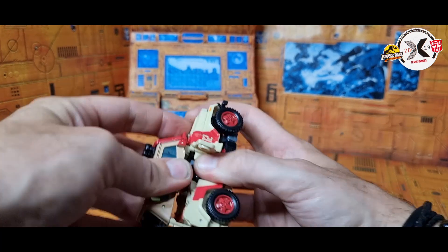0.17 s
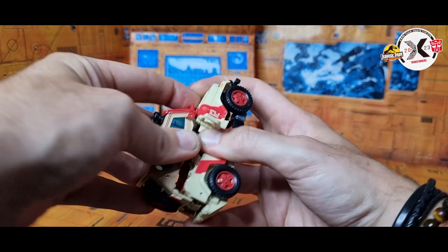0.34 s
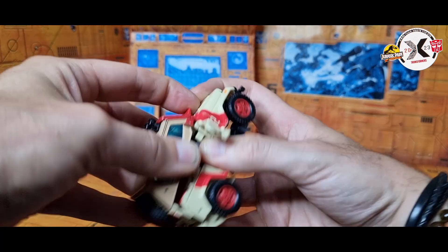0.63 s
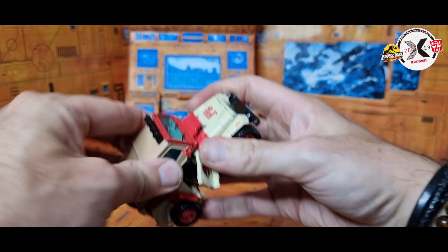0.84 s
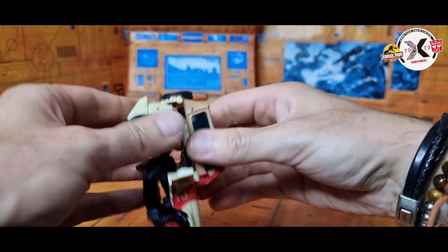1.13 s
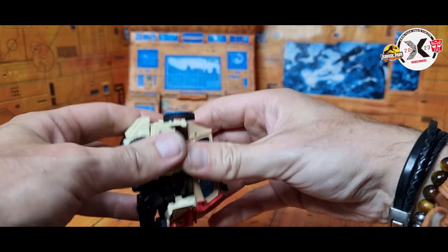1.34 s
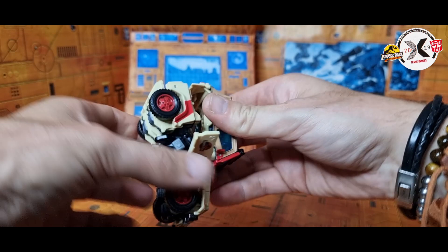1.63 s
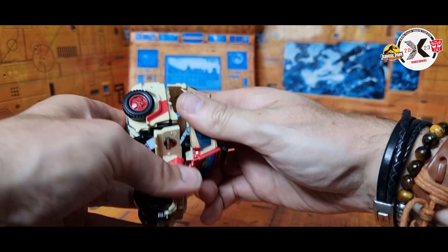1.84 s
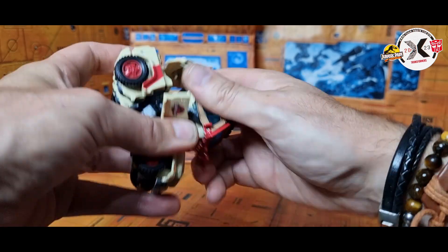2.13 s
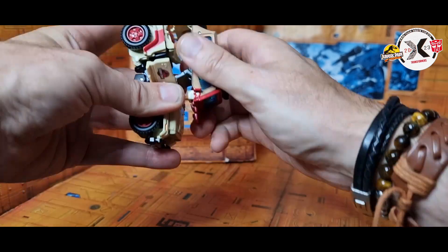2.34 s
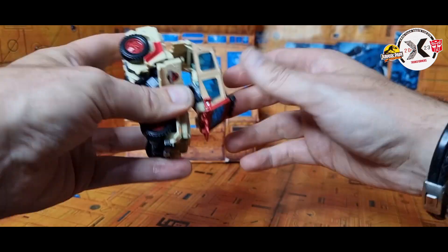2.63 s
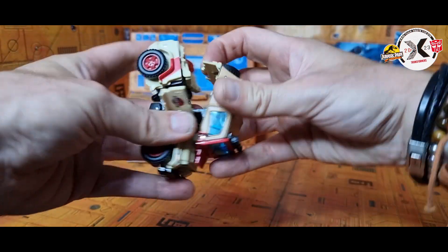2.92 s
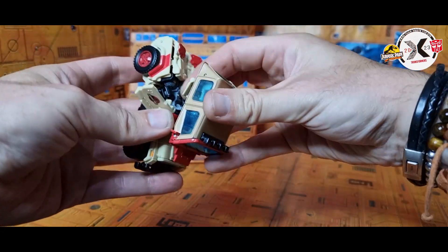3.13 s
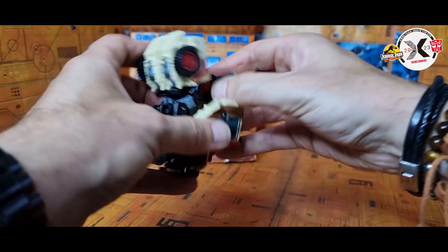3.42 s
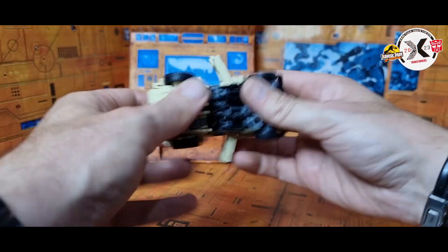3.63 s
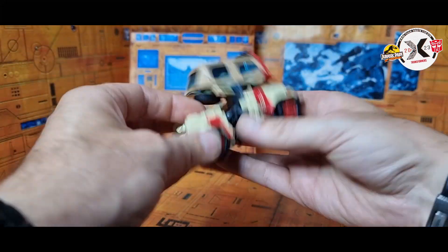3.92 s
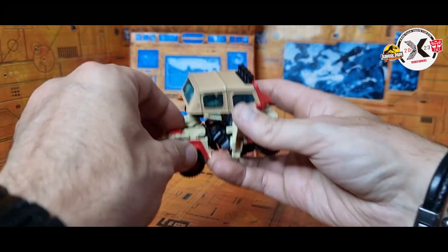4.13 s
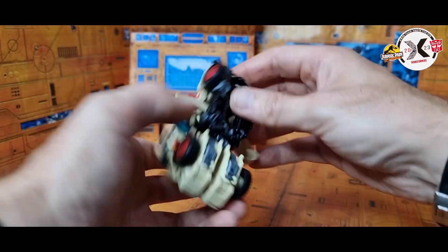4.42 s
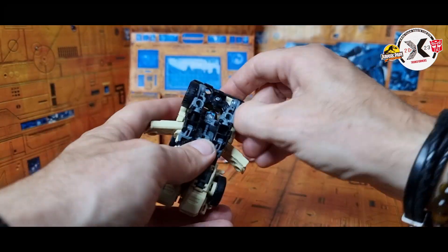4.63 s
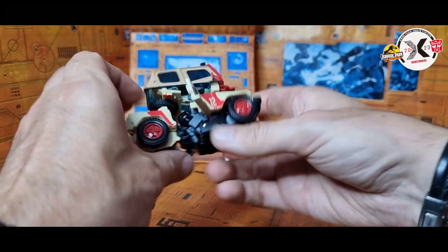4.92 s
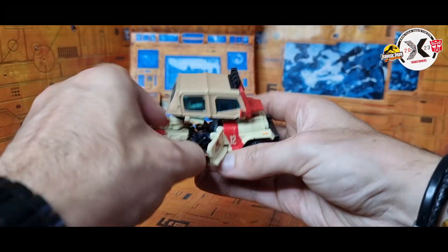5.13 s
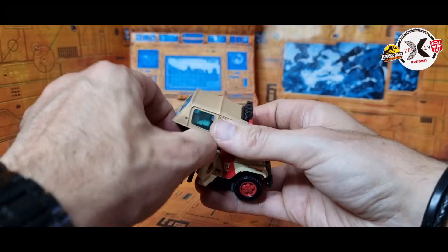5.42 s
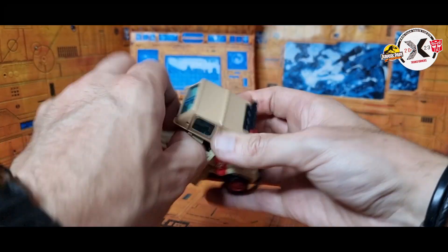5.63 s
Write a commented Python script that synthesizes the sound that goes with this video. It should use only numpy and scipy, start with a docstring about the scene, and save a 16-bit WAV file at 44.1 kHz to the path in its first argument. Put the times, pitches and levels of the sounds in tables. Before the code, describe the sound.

A hollow plastic toy is turned and folded by hand, its joints and tabs clicking irregularly over soft scraping. The clicks are busiest and loudest early, with one hard snap standing out. After thinning briefly, they return as lighter ticks and small squeaks. The sound is close and nearly dry, in a quiet room with faint hum and a soft low rustle.

```python
"""Plastic chafes, then snaps, as two hands twist a toy figure near a phone's two microphones.
Joints and tabs let go in short bursts of slips; these and the chafing ring the hollow shell.
Each snap jolts the hands with a low thud. Brief near-pure tones sound with some snaps or on their own.
Table and backdrop add a short echo. The room is quiet: rumble, hiss, a low wavering hum,
and a soft low rustle that swells at a steady pace."""
import sys
import numpy as np
from scipy import signal
from scipy.io import wavfile

SR = 44100
rng = np.random.default_rng(int(sys.argv[2]) if len(sys.argv) > 2 else 0)


def dump_mix(stems):
    """Bounce the given channels to the path in sys.argv[1] as a 16-bit WAV at rate SR."""
    frames = np.atleast_2d(stems).T  # one column per channel
    limited = np.clip(frames, -1, 1)  # hard clip at full scale
    pcm = np.round(limited * 32767).astype(np.int16)
    wavfile.write(sys.argv[1], SR, pcm)


N = 254016

# two spells of chafing, each: t/s, body level/dB, treble level/dB
CHAFE_SPELLS = [
    [(0.0, -65, -74), (.15, -66, -79), (0.22, -72, -85), (0.31, -74.5, -84), (0.48, -66, -68.5),
     (.6, -73, -72), (0.67, -77.5, -85), (0.85, -68.5, -75.5), (1.05, -68.5, -78.5), (1.2, -69, -74),
     (1.48, -72, -83), (1.63, -65, -71.5), (1.72, -70.5, -84), (1.8, -80, -88), (2.05, -86, -95),
     (2.2, -105, -104)],
    [(3.28, -100, -100), (3.33, -79, -89), (3.5, -80, -95), (3.6, -73.5, -80), (3.78, -71, -72),
     (3.92, -74, -80), (3.97, -78.5, -92), (4.07, -74.5, -79), (4.18, -77.5, -86.5), (4.3, -78, -92),
     (4.4, -74, -73), (4.55, -72.5, -74.5), (4.73, -88, -95), (4.87, -91.5, -100), (5.0, -73, -89.5),
     (5.14, -77, -88.5), (5.22, -73.5, -69), (5.39, -73, -77.5), (5.5, -87, -100), (5.62, -91, -100),
     (5.76, -74.5, -83.5)],
]
# pitches that chafing stirs more: f/Hz, boost/dB
CHAFE_PEAKS = [(2300, 2.5), (6600, 3)]
# hollow shell: f/Hz, level/dB, t60/s
SHELL_MODES = [(535, 11.5, 0.0047), (880, 13.5, 0.0069), (1168, 12.5, 0.0081), (1510, 15.5, 0.0014),
               (2148, 7, 0.0065), (1900, -9.5, 0.024), (2388, 4.5, 0.01), (2692, 2, 0.02),
               (3240, -6, 0.008), (2930, -1, 0.011), (3400, 3, 0.0076), (3700, -2, 0.011),
               (4000, 4.5, 0.0024), (4387, 1.5, 0.013), (4755, 6, 0.0029), (5365, 4, 0.017),
               (5750, 7, 0.00083), (6350, 8, 0.0017), (6560, 8, 0.00098), (7410, 3, 0.0082),
               (8640, -4.5, 0.0076), (10030, 4.5, 0.001), (10120, 2, 0.0047), (11100, 0, 0.0016),
               (11600, 5, 0.0018), (12800, 3.5, 0.0026), (13000, 2.5, 0.0025), (14200, 9, 0.0024),
               (15100, 3.5, 0.0022), (15500, 9.5, .003)]
# shell balance at the microphones: f/Hz, left-right/dB
SHELL_PAN = [(600, -0.5), (1200, -0.5), (2400, -3), (4000, -4.5), (6500, 2), (9000, 4.5), (13000, -1)]
# room noise, low part: f/Hz, density/dB per Hz
ROOM_RUMBLE = [(15, -110), (28, -93.5), (60, -96), (120, -85.5), (200, -88.5), (260, -89), (330, -94.5),
               (400, -102)]
# room noise, upper part: f/Hz, density/dB per Hz
ROOM_HISS = [(560, -105), (900, -104), (1150, -107), (1450, -117), (1750, -117), (2250, -110), (2900, -116),
             (5300, -117), (7200, -125), (8300, -135), (10500, -133), (12500, -126), (14500, -124),
             (16000, -130)]
# room noise image: f/Hz, left-right correlation, left-right/dB
ROOM_STEREO = [(30, 0.0011, -1), (250, 0.054, -2.5), (500, 0.0003, -2), (2000, 0.0045, -1),
               (11980, 0.028, -6)]
# wavering tones: f/Hz, width/Hz, level/dB
HUM_TONES = [(121, 7, -68), (313.6, 47, -68)]
# successive rustle swells: level/dB
RUSTLE_LEVELS_DB = [-58.5, -62.5, -69, -83, -70, -65.5, -70]
# joints snapping: t/s, level/dB, centre f/Hz, width/octaves, 6 dB rise/ms, left-right/dB
SNAPS = [(0.1242, -49, 4180, 0.4, 3, 6), (0.153, -48.5, 4000, 1.8, 3.5, 2), (.165, -54.5, 3400, 1, 10, 4),
         (0.1993, -42.5, 3100, 3.6, 2.5, 6), (0.2347, -44, 4530, 0.58, 1.3, 4),
         (.256, -44.5, 3800, 1.6, 5, 11), (0.2665, -33, 3700, 3.6, 3.5, 1.5),
         (0.363, -45, 3820, 1.3, 2.5, 5), (0.372, -42.5, 3520, 0.92, 3, 4),
         (0.382, -40, 4080, 0.87, 3.5, 4), (0.4112, -34.5, 3160, 1.5, 4.5, 4.5),
         (0.424, -43.5, 3100, 0.74, 5.5, 2), (.477, -53.5, 3020, 0.3, 6, 4), (0.492, -52, 3040, 0.1, 3, 1),
         (0.565, -41.5, 3700, 1.4, 6, -2.5), (.571, -31, 3700, 4.6, 3, 6),
         (0.7083, -49.5, 3870, 2.4, 10, 4.5), (0.732, -48, 4350, 1.2, 3.5, 3.5),
         (0.766, -52, 4500, 1.5, 2.5, 3), (0.7792, -53, 5800, 4, 5, 8.5), (0.793, -54, 5000, 2.6, 2.5, 4),
         (.885, -63, 6000, 3.8, 4, 1.5), (0.9673, -45, 5100, 1.1, 3.5, 2),
         (1.009, -46.5, 3280, 1.3, 4.5, 4), (1.0298, -50, 3760, 0.83, 2, 5),
         (1.051, -41, 2440, 0.82, 2.5, 3.5), (1.088, -51, 3650, 0.45, 2, 3),
         (1.1673, -45.5, 4340, 0.26, 0.8, -2), (1.2013, -52.5, 3800, 0.62, 6, 5),
         (1.2965, -46.5, 3700, 1.9, 3, 6.5), (1.3376, -45, 5100, 2.2, 2, 2), (1.348, -49, 4000, 2, 6, 7),
         (1.372, -56, 3700, 0.75, 6.5, 2), (1.399, -47, 3200, 0.93, 4, 1), (1.4054, -36.5, 4200, 1.3, 1, 3),
         (1.4225, -41, 4920, 1.3, 7.5, 8), (1.4276, -37.5, 5040, 1.6, 1.7, 18),
         (1.4315, -24.5, 4770, 1.1, 2, -3.5), (1.4342, -17, 4000, 1.12, 0.7, 4.5),
         (1.484, -53.5, 4350, 0.74, 2, 3), (1.527, -52, 4530, 0.82, 2, 5), (1.5422, -49.5, 4160, 1.4, 5, 4),
         (1.6187, -54, 3700, 0.36, 6, 1), (1.677, -54, 4300, 0.39, 7.5, -3),
         (1.7447, -44, 4100, 1.25, 3, 4.5), (1.7806, -58.5, 2960, 0.45, 13, 0),
         (1.863, -64.5, 2980, 0.33, 4, -2.5), (1.9281, -54, 4700, 1.9, 3.5, 2),
         (1.9383, -57, 4100, 1.1, 2.5, 3), (2.0236, -38, 2880, 3.1, 3.5, 6),
         (2.0368, -43, 2850, 0.57, 3.5, 1), (2.094, -50, 2790, 0.56, 4.5, 3),
         (2.127, -50, 3030, 1.3, 1.5, 7), (2.136, -39, 3080, 1.45, 3.5, 6),
         (2.1451, -39.5, 3240, 0.74, 5, 3), (2.182, -60.5, 2480, 0.93, 12, 3.5),
         (2.3986, -46.5, 2250, 0.17, 3, 1.5), (2.4822, -38.5, 2730, 0.75, 4, 4),
         (2.525, -58.5, 3400, 0.58, 6, 1), (2.563, -43, 3320, 1.5, 4, 3), (2.7816, -58, 4200, 0.28, 8, -1),
         (2.872, -64, 3830, 0.13, 10, 5), (3.1377, -40, 3400, 0.77, 3.5, 7),
         (3.146, -47.5, 3590, 1.2, 7, 1), (3.2065, -59.5, 2600, 2.4, 7, 3.5),
         (3.312, -64.5, 4000, 1.3, 4.5, 7), (3.556, -61.5, 4600, 0.38, 6, 6.5),
         (3.601, -58.5, 3040, 0.86, 4, 2), (3.6227, -51, 3330, 0.3, 3, -4), (3.63, -50.5, 3300, 0.27, 5, 4),
         (3.6675, -59, 4000, 0.46, 8, 3), (3.677, -55.5, 3950, .7, 12, 1),
         (3.7012, -50.5, 3700, 0.48, 4, 6.5), (3.744, -59.5, 4000, 0.98, 12, -1),
         (3.7594, -50.5, 3400, 0.25, 4.5, 1), (3.822, -60, 3700, 0.46, 4.5, 1),
         (3.879, -50.5, 2630, 0.3, 3.5, 0), (3.892, -54.5, 4500, 2, 7, 3),
         (3.935, -60.5, 4000, 0.85, 14, 4), (3.996, -57.5, 7160, 0.89, 5, 7.5),
         (4.012, -59, 5000, 1.2, 4, 2), (4.063, -54.5, 2900, 0.61, 3, 2), (4.098, -60, 3180, 0.67, 9, 2),
         (4.139, -54.5, 3700, 0.63, 10, 2), (4.1463, -37, 4000, 0.35, 1.7, 4),
         (4.2642, -59, 3180, 0.51, 6, 0), (4.2794, -59.5, 4370, 0.55, 5, 3), (4.3496, -34, 5030, 1, 2.5, 2),
         (4.51, -56, 5430, 0.93, 6, 5.5), (4.704, -62.5, 3230, 2.4, 4, 4.5), (4.911, -61, 3340, 1, 8, 2),
         (4.9294, -55, 2900, 0.24, 4, 0), (4.9555, -54.5, 4970, 0.2, 4.5, 6),
         (4.994, -52, 2920, 0.79, 4.5, 1), (5.014, -63, 3200, 0.77, 9, 2), (5.043, -62, 4100, 0.23, 6, 7),
         (5.064, -54.5, 3920, 0.19, 11, 3.5), (5.082, -70, 3600, 0.36, 1, 2),
         (5.097, -60.5, 3600, 1.1, 7, 5), (5.13, -67, 3800, 0.34, 4, 4), (5.1785, -64, 2610, .5, 0, -5),
         (5.2025, -48, 3800, 0.74, 5.5, 2.5), (5.2412, -48.5, 3400, 1.25, 4.5, 1),
         (5.301, -59.5, 3550, 0.14, 2.5, -5), (5.368, -65, 3770, 0.32, 4.5, 2),
         (5.4113, -55.5, 4160, 0.93, 1, 3), (5.4284, -53.5, 2850, 0.66, 3.5, 3),
         (5.4675, -63.5, 3400, 0.29, 12, 2), (5.5252, -63, 3250, 0.47, 2.8, 3),
         (5.5992, -61.5, 3170, 0.88, 1.7, 3), (5.684, -55.5, 3400, 0.75, 3.5, 3.5),
         (5.7054, -53.5, 4200, 0.34, 6, 1.5)]
# snaps that jar the whole figure: t/s, bass re body/dB
SNAP_KNOCKS = [(.1256, -11), (.154, -9.5), (.1997, -9.5), (.3819, -12.5), (.571, -16), (.7798, -9.5),
               (.9685, -21), (1.01, -9.5), (1.4338, -21.5), (1.7441, -12.5), (2.1437, -14), (2.3988, -15.5),
               (2.4819, -15), (2.563, -21.5), (3.1386, -19.5), (4.1475, -26), (4.2652, -13), (5.7052, -9.5)]
# snaps crisper or duller than their width implies: t/s, treble boost/dB
SNAP_CRISPNESS = [(.1997, -1.5), (.2671, -7.5), (.3819, -5), (.4105, 0), (.493, -3), (.571, -5.5),
                  (.7088, -8), (.9685, 9), (1.4052, 5), (1.4283, 15.5), (1.4338, 11), (1.7441, 7),
                  (2.0243, -4.5), (2.1437, 3.5), (2.3988, -7), (2.4819, -7), (2.563, -9), (2.7808, 3),
                  (3.1386, -10.5), (3.6286, -1), (3.7014, 13), (4.1475, 15), (4.3494, 1.5), (5.2014, 2.5),
                  (5.2418, 1)]
# modes that one snap stirs more or less: t/s, mode f/Hz, boost/dB
SNAP_ACCENTS = [(.2671, 1900, -3), (.2671, 4755, 4.5), (.4105, 1900, 2), (.571, 2692, -4),
                (1.4052, 6560, 1), (1.4338, 2692, 2.5), (1.4338, 4000, -7), (1.4338, 1900, -6),
                (1.4338, 6560, -10), (2.0243, 2692, 5), (2.0243, 2148, -3.5), (2.4819, 2388, 2),
                (2.563, 2148, 0), (3.1386, 3400, -6), (3.147, 4755, 11), (3.6286, 4755, 10),
                (3.7014, 5365, 9), (4.1475, 3700, 5), (4.3494, 3400, 9.5), (4.3494, 4387, 6),
                (4.3494, 5365, -16), (4.3494, 5750, -20), (4.3494, 6560, 8), (4.9947, 3400, 7)]
# brief near-pure tones: peak t/s, level/dB, f/Hz, length/ms, left-right/dB
BRIEF_TONES = [(.258, -50, 1670, 5.8, -5), (.266, -50.5, 1655, 5.7, -0.5), (0.4077, -46.5, 1670, 4.7, -1),
               (0.4168, -47, 1650, 6.8, 0), (0.4257, -55, 1720, 6, 2), (.412, -41.5, 3500, 4, 3),
               (1.4335, -37, 2045, 5.6, 4), (1.4353, -29, 2600, 3.1, 0.5), (.491, -54, 3030, 9, 3),
               (1.4348, -26.5, 3110, 3.5, -12), (1.707, -60, 2870, 8, -2), (2.144, -45, 3100, 4.3, 3),
               (3.1365, -41.5, 2284, 4.3, -2), (3.139, -37, 4820, 4.1, -3), (1.7852, -55.5, 2520, 5, 2.5),
               (3.2355, -68, 2276, 6.2, -13), (3.311, -62.5, 2260, 10, -2), (3.3705, -70, 2360, 11, -7),
               (3.629, -58, 2350, 17, -11), (3.7477, -47, 2380, 9.5, -3), (3.7913, -66, 2340, 5.7, -10),
               (3.899, -57.5, 2320, 6.3, -3.5), (3.9535, -59.5, 2520, 5.7, -2.5),
               (4.0295, -67, 2360, 11, -6), (2.0248, -56.5, 1500, 8, 2.5), (3.14, -59, 1416, 8, -0.5),
               (5.203, -52, 5440, 8.9, 2), (5.234, -58, 2000, 7, -3), (4.35, -58, 1446, 7.8, -4),
               (4.9555, -62, 2400, 9, -9), (4.996, -58, 2500, 6, -2), (5.0167, -55.5, 2360, 5.4, -12),
               (5.0252, -53.5, 2530, 9.2, 2), (5.035, -56, 2464, 5, -0.4), (5.0433, -57, 2330, 5, -10),
               (5.052, -50, 2400, 4.7, 6), (5.064, -63, 2410, 9.1, 1), (5.0807, -50.5, 2380, 10, -3),
               (5.0958, -50, 2380, 8.4, -2), (5.1799, -62, 2380, 11, -2), (5.4316, -62, 2335, 11.4, -6),
               (5.6005, -66.5, 2371, 7.5, -6)]

BASS_TOP_HZ, TREBLE_FROM_HZ = 1500, 9000   # the body band lies between
HALF_BURST_SAMPLES = 1536
LEFT_RIGHT = np.array([[1], [-1]])


def from_db(db):
    return 10 ** (np.asarray(db) / 20)


def unit_rms(x):
    return x / np.sqrt(np.mean(x ** 2) + 1e-20)


def pan(left_right_db):
    return from_db(left_right_db / 2 * LEFT_RIGHT)


def at_hz(table, hz, column=1):
    table = np.array(table)
    return np.interp(np.log(hz), np.log(table[:, 0]), table[:, column])


def butter(x, edges_hz, kind, order=2):
    return signal.sosfilt(signal.butter(order, edges_hz, kind, fs=SR, output="sos"), x)


def drift(rate_hz):
    """Slow random wander, rms 1."""
    hop, settle = 40, 2000
    r = np.exp(-2 * np.pi * rate_hz * hop / SR)
    slow = signal.lfilter([1], [1, -2 * r, r * r], rng.standard_normal(N // hop + settle + 2))[settle:]
    return np.interp(np.arange(N) / hop, np.arange(len(slow)), unit_rms(slow))


def resonate(x, hz, t60_s):
    """One decaying mode, t60 at least 2 ms; white noise keeps its rms."""
    loss, w = np.log(1000) / (max(t60_s, .002) * SR), 2 * np.pi * hz / SR
    r = np.exp(-loss)
    return signal.lfilter([0, 2 * np.sqrt(loss) * np.sin(w)], [1, -2 * r * np.cos(w), r * r], x + 1e-18)


def band_of(hz):
    """0 bass, 1 body, 2 treble."""
    return (hz > BASS_TOP_HZ).astype(int) + (hz > TREBLE_FROM_HZ)


def band_shares(hz, level_db):
    """Mode gains, scaled to power 1 in each band."""
    gain = from_db(level_db)
    for band in range(3):
        inside = band_of(hz) == band
        gain[..., inside] /= np.linalg.norm(gain[..., inside], axis=-1, keepdims=True)
    return gain


def slips(shape, per_s, spread_db):
    """Stick-slip friction: random impulses of uneven size, rms 1."""
    sizes = from_db(spread_db * np.minimum(rng.exponential(1, shape), 4)) * rng.choice([-1, 1], shape)
    return unit_rms(sizes * (rng.random(shape) < per_s / SR))


def chafe_levels_db():
    """Body and treble level per sample; silent between spells."""
    t, levels_db = np.arange(N) / SR, np.full((2, N), -120.)
    for spell in CHAFE_SPELLS:
        times_s, *curves_db = np.transpose(spell)
        moving = (t >= times_s[0]) & (t <= times_s[-1])
        levels_db[:, moving] = [np.interp(t[moving], times_s, db) for db in curves_db]
    return levels_db


def chafing(hz, mode_db, body_db, treble_db):
    """Rubbing parts slip in a stream; yields a flickering stereo drive per mode."""
    stream = slips((2, N), per_s=3600, spread_db=2.6) * from_db(2.2 * drift(43))
    bass_db = body_db - 17
    bands = from_db([bass_db, body_db, treble_db])[:, None] * stream
    boost_db = sum(db * np.exp(-(5 * np.log2(hz / peak_hz)) ** 2) for peak_hz, db in CHAFE_PEAKS)
    for gain, band in zip(band_shares(hz, mode_db + boost_db), band_of(hz)):
        yield gain * from_db(3 * drift(26)) * bands[band]


def ticks(chafe_db, count=45):
    """Faint random snaps, denser and louder where chafing is harder; rows as in SNAPS."""
    jitter, size, pitch, width, rise, side = rng.random((count, 6)).T
    rubbed = np.cumsum(from_db(chafe_db / 2))
    at = np.minimum(np.searchsorted(rubbed / rubbed[-1], (np.arange(count) + jitter) / count), N - 1)
    level_db = chafe_db[at] + 1 - 2 * np.log(size + .05)
    centre_hz = 2300 * (5000 / 2300) ** pitch
    width_oct = .5 * (1.6 / .5) ** width
    rise_ms = 1.3 * (5 / 1.3) ** rise
    return np.transpose([at / SR, level_db, centre_hz, width_oct, rise_ms, 5 * (2 * side - 1)])


def room_noise(flicker_db=2.5):
    """Rumble and hiss in third-octave bands, each flickering on its own."""
    out, edges_hz = 0, 20 * 2 ** np.arange(0, 9.9, 1 / 3)
    white = rng.standard_normal((2, 2, N))
    for k, (low_hz, high_hz) in enumerate(zip(edges_hz, edges_hz[1:])):
        hz = np.sqrt(low_hz * high_hz)
        mid, side = butter(white[k % 2], [low_hz, high_hz], "band")
        correlation = at_hz(ROOM_STEREO, hz)
        stereo = np.sqrt(1 + correlation) * mid + np.sqrt(1 - correlation) * side * LEFT_RIGHT
        gain = from_db(at_hz(ROOM_RUMBLE + ROOM_HISS, hz) + flicker_db * drift(5.5))
        out += gain * pan(at_hz(ROOM_STEREO, hz, column=2)) * stereo
    return out * np.sqrt(SR / 4)   # two unit white noises hold 4 / SR of power per Hz


def hum(waver_db=2.5, waver_hz=3.4):
    """Wavering low tones: noise twice through a narrow resonance, left and right unrelated."""
    out = 0
    for hz, width_hz, level_db in HUM_TONES:
        t60_s = np.log(1000) / (np.pi * width_hz)
        gain = from_db(level_db + waver_db * drift(waver_hz))
        narrow = resonate(rng.standard_normal((2, N)), hz, t60_s)
        out += gain * unit_rms(resonate(narrow, hz, t60_s))
    return out


def rustle(first_s=.095, every_s=.82, length_s=.23, band_hz=(233, 564)):
    """Low band noise in evenly spaced soft swells, left and right unrelated."""
    t = np.arange(N) / SR
    swells = sum(from_db(db) * np.exp(-(2 * (t - first_s - k * every_s) / length_s) ** 4)
                 for k, db in enumerate(RUSTLE_LEVELS_DB))
    return swells * unit_rms(butter(rng.standard_normal((2, N)), band_hz, "band"))


def nearest_snap(time_s):
    return np.argmin(abs(np.array(SNAPS)[:, 0] - time_s))


def snap_bursts(rise_ms, fall_per_rise=1.05, crack_db=10.5):
    """A short crackle that swells to one sharp crack and fades; one row per snap."""
    ms = np.arange(-HALF_BURST_SAMPLES, HALF_BURST_SAMPLES) / SR * 1000
    rise_ms, fall_ms = np.clip([rise_ms, fall_per_rise * rise_ms], .8, 12)[:, :, None]
    envelope = from_db(-6 * np.where(ms < 0, -ms / rise_ms, ms / fall_ms) ** 1.096)
    bursts = slips(envelope.shape, per_s=7000, spread_db=3.8) * envelope
    bursts[:, HALF_BURST_SAMPLES] += from_db(crack_db)
    energy = np.sum(envelope ** 2, axis=1)   # a snap frees a set energy
    return bursts * np.sqrt(energy / np.sum(bursts ** 2 + 1e-20, axis=1))[:, None]


def snap_focus_db(hz, centre_hz, width_oct):
    """A snap stirs body modes near its centre most, those far above weakly, those far below least."""
    distance = np.log2(hz / centre_hz[:, None]) / width_oct[:, None]
    floor_db = -15.5 + .5 * np.log2(np.minimum(width_oct, 1))[:, None] - 24 * (distance < 0)
    focus_db = np.maximum(-9 * distance ** 2, floor_db) * (band_of(hz) == 1)
    for time_s, mode_hz, boost_db in SNAP_ACCENTS:
        focus_db[nearest_snap(time_s), np.argmin(abs(hz - mode_hz))] += boost_db
    return focus_db


def snap_bands_db(width_oct):
    """Bass, body and treble re body, per snap; wider snaps are crisper."""
    bass_db = np.full(len(width_oct), -25.5)
    treble_db = -14 + 5.5 * np.log2(width_oct)
    for time_s, knock_db in SNAP_KNOCKS:
        bass_db[nearest_snap(time_s)] = knock_db
    for time_s, boost_db in SNAP_CRISPNESS:
        treble_db[nearest_snap(time_s)] += boost_db
    return np.stack([bass_db, np.zeros_like(bass_db), treble_db], axis=1)


def snapping(hz, mode_db, events, strike_spread_db=2.5, pan_spread_db=1.5, lag_spread_ms=.8):
    """Joints let go in bursts; yields a stereo drive per mode."""
    times_s, level_db, centre_hz, width_oct, rise_ms, pan_db = events.T
    bursts = snap_bursts(rise_ms)
    scatter = rng.standard_normal((len(events), 2, len(hz)))
    # each mode leaves another face of the toy, so has its own left-right lag
    lag_samples = rng.uniform(-1, 1, (len(events), len(hz))) * lag_spread_ms * SR / 1000
    strike_db = mode_db + snap_focus_db(hz, centre_hz, width_oct) + strike_spread_db * scatter[:, 0]
    band_db = level_db[:, None] + snap_bands_db(width_oct)[:, band_of(hz)]
    gain = band_shares(hz, strike_db) * from_db(band_db)
    gain *= (-1) ** np.arange(len(hz))   # neighbouring modes swing against each other
    lean = from_db((pan_db[:, None] + pan_spread_db * scatter[:, 1]) / 2)
    span = 2 * HALF_BURST_SAMPLES
    for m in range(len(hz)):
        drive = np.zeros((2, N + 2 * span))
        for e, burst in enumerate(bursts):
            left = round(times_s[e] * SR) + HALF_BURST_SAMPLES
            right = left + round(lag_samples[e, m])
            drive[0, left:left + span] += gain[e, m] * lean[e, m] * burst
            drive[1, right:right + span] += gain[e, m] / lean[e, m] * burst
        yield drive[:, span:span + N]


def shell(bass_cut_hz=505, upper_cut_hz=1835):
    """Snaps, ticks and chafing ring the same modes; small parts hardly radiate below the cuts."""
    hz, mode_db, t60_s = np.transpose(SHELL_MODES)
    body_db, treble_db = chafe_levels_db()
    snaps = snapping(hz, mode_db, np.vstack([SNAPS, ticks(body_db)]))
    rubs = chafing(hz, mode_db, body_db, treble_db)
    bass, upper = np.zeros((2, 2, N))
    for mode_hz, mode_t60_s, snap, rub in zip(hz, t60_s, snaps, rubs):
        ringing = pan(at_hz(SHELL_PAN, mode_hz)) * resonate(snap + rub, mode_hz, mode_t60_s)
        if mode_hz > BASS_TOP_HZ:
            upper += ringing
        else:
            bass += ringing
    return butter(bass, bass_cut_hz, "high", order=6) + butter(upper, upper_cut_hz, "high", order=6)


def thuds(hz=176.6, t60_s=.026, gain_db=-27):
    """Each snap jolts the hands: a low dull push in step with its strength."""
    times_s, level_db = np.transpose(SNAPS)[:2]
    pushes = np.zeros(N)
    pushes[np.round(times_s * SR).astype(int)] = from_db(level_db + gain_db) * np.sqrt(.005 * SR)
    return resonate(butter(pushes, [.55 * hz, 7.5 * hz], "band"), hz, t60_s)


def echoes(x, t60_s=.04, gap_s=.002):
    """Table and backdrop return a short diffuse tail, different at each microphone."""
    t = np.arange(round(.15 * SR)) / SR
    tail = rng.standard_normal((2, len(t))) * from_db(-60 * t / t60_s) * (t > gap_s)
    tail /= np.linalg.norm(tail, axis=1, keepdims=True)
    return signal.fftconvolve(x, tail, axes=1)[:, :N]


def brief_tones(right_lag_ms=.073, flutter_depth=.1, flutter_hz=477):
    """Brief near-pure tones, some on their own, some the strongest pitches of a snap."""
    out, half = np.zeros((2, N + SR)), 1024
    ms = np.arange(-half, half) / SR * 1000
    for time_s, level_db, hz, length_ms, pan_db in BRIEF_TONES:
        phase = 2 * np.pi * (hz * (ms - [[0], [right_lag_ms]]) / 1000 + rng.random())
        noise = rng.standard_normal((2, 2, 2 * half))
        flutter = flutter_depth * unit_rms(butter(noise, flutter_hz, "low"))
        tone = (1 + flutter[0]) * np.sin(phase) + flutter[1] * np.cos(phase)
        envelope = np.sqrt(2) * from_db(level_db - 6 * (2 * ms / length_ms) ** 2)
        at = round(time_s * SR) - half
        out[:, at:at + 2 * half] += pan(pan_db) * envelope * tone
    return out[:, :N]


def scene():
    toy = from_db(3) * shell() + brief_tones()
    room = room_noise()
    return toy + from_db(-13) * echoes(toy) + thuds() + room + hum() + rustle()


def record(dry):
    """Steep low-pass, 70 dB down from 16.2 kHz."""
    return signal.sosfilt(signal.cheby2(16, 70, 16200, fs=SR, output="sos"), dry)


dry = scene()
out = record(dry)
dump_mix(out)
```